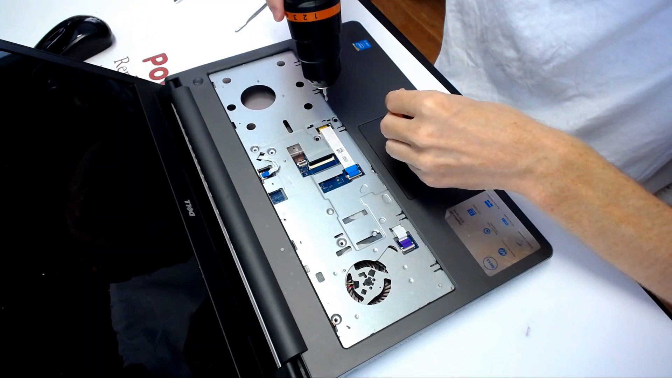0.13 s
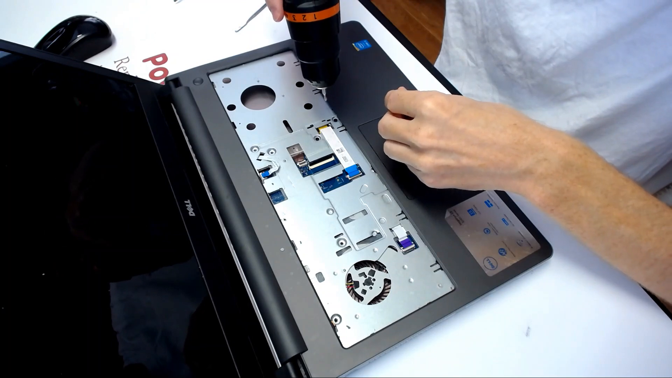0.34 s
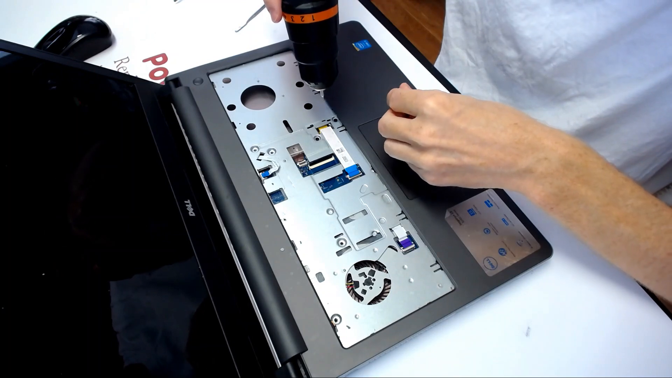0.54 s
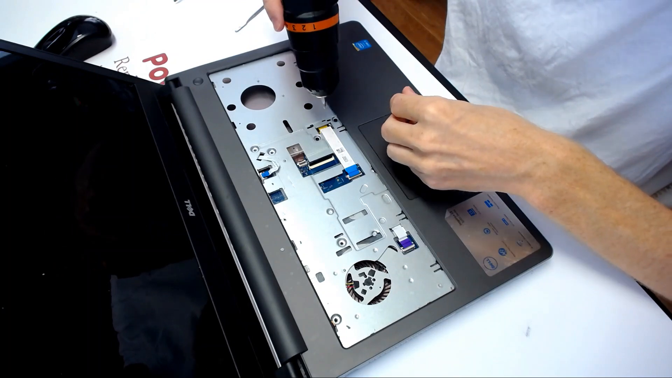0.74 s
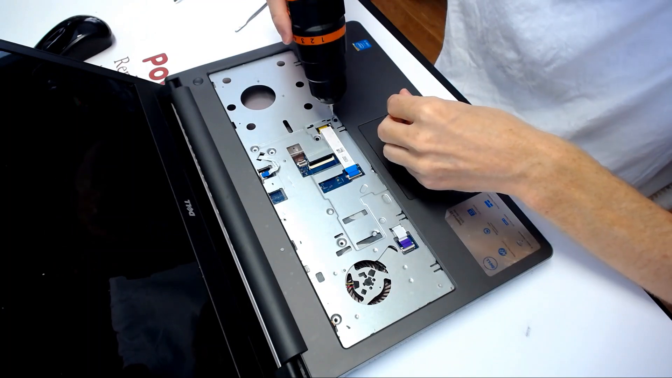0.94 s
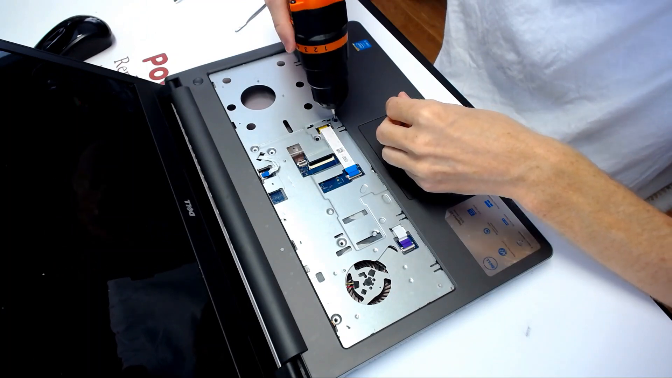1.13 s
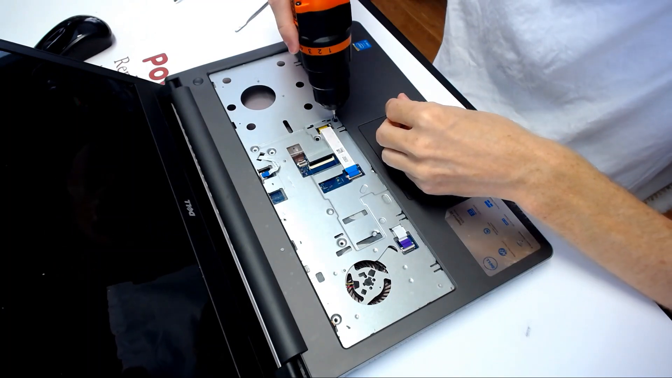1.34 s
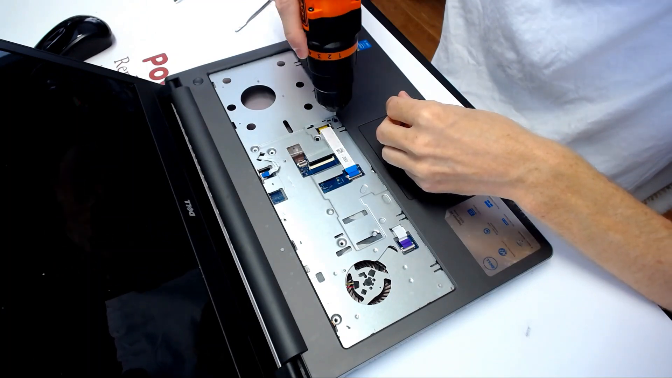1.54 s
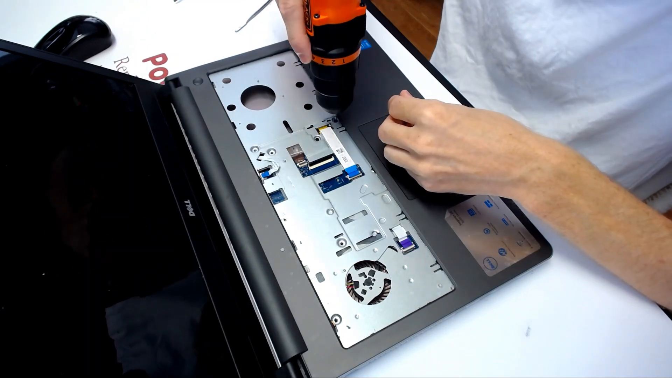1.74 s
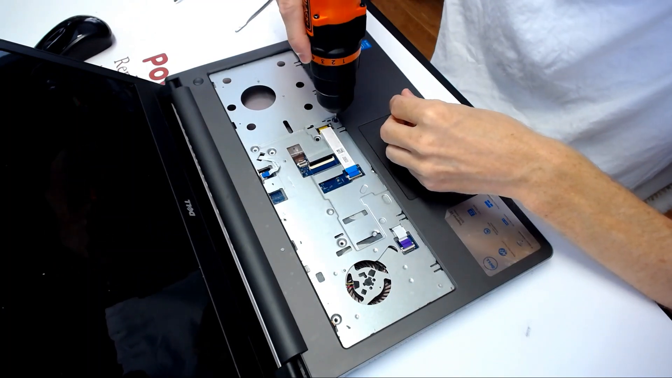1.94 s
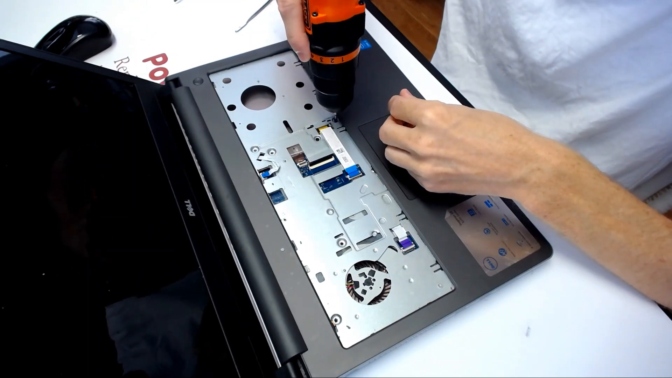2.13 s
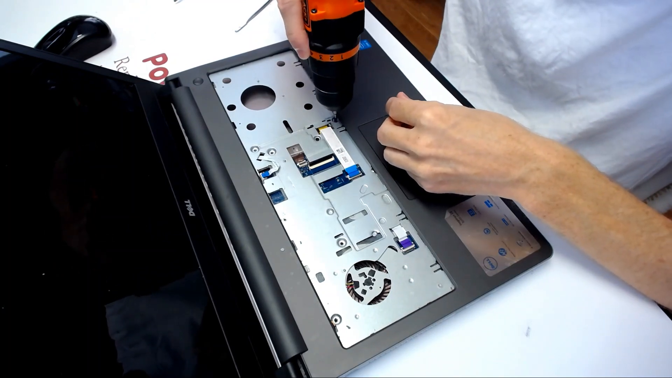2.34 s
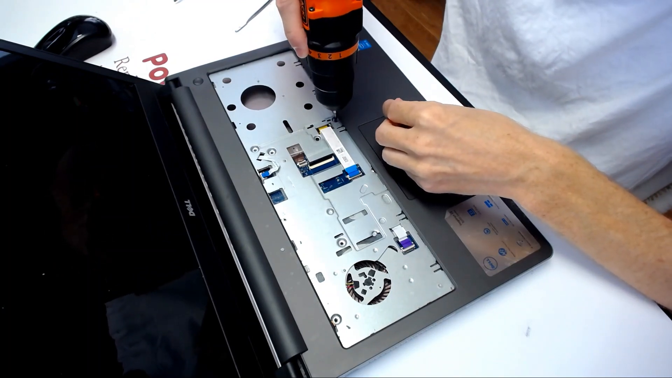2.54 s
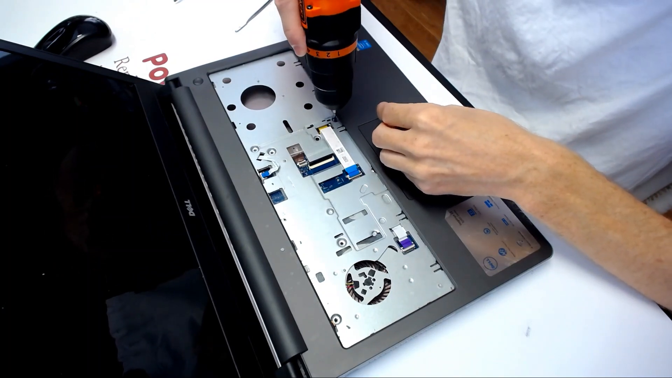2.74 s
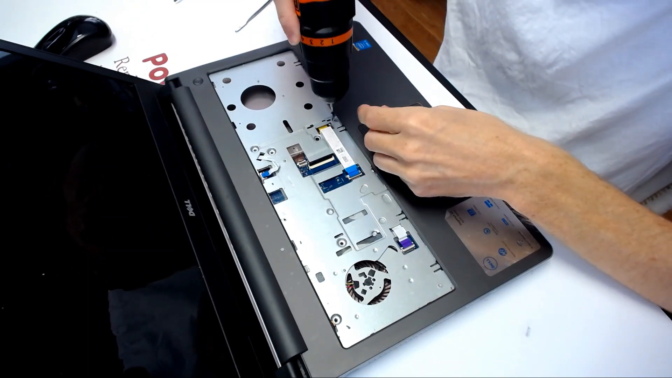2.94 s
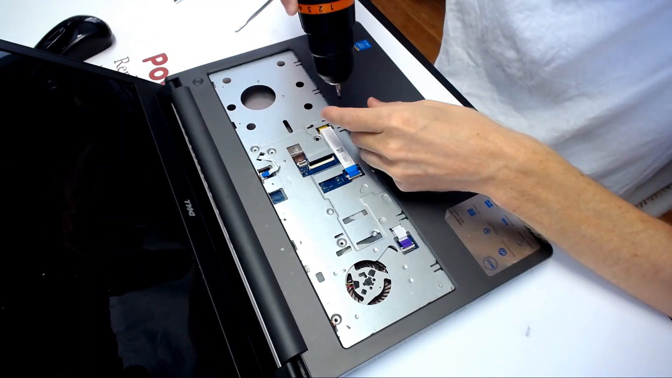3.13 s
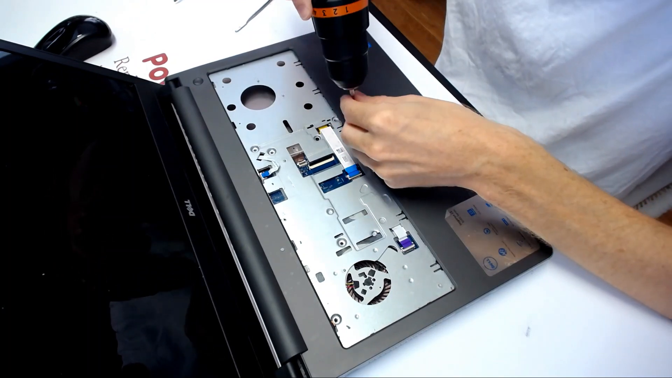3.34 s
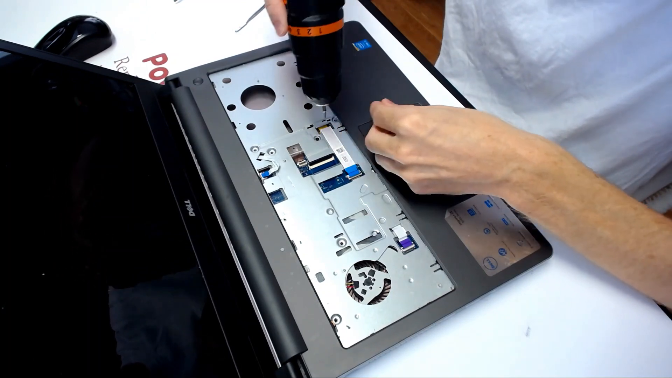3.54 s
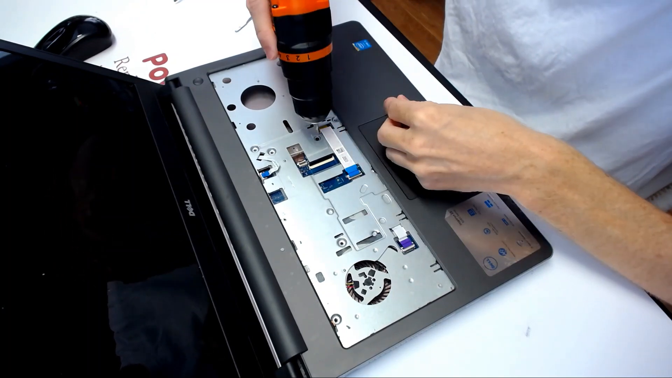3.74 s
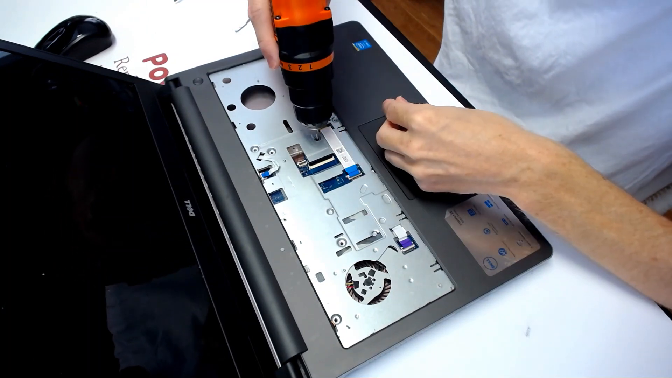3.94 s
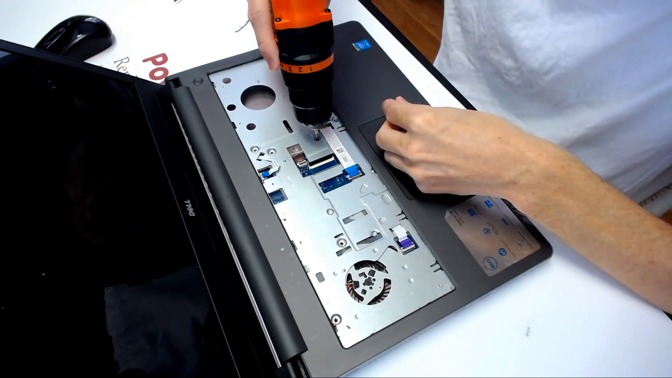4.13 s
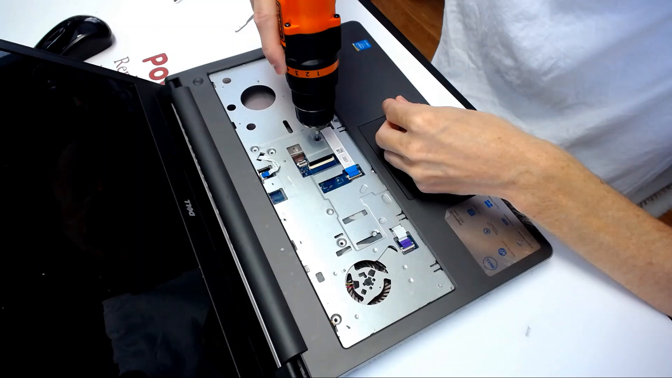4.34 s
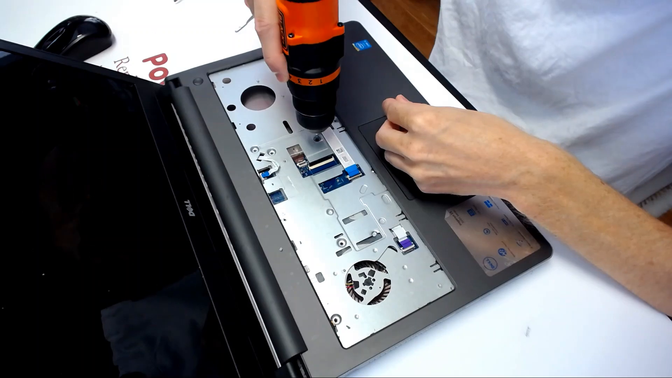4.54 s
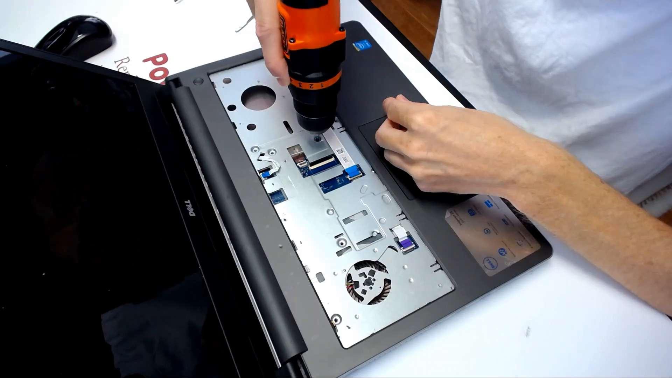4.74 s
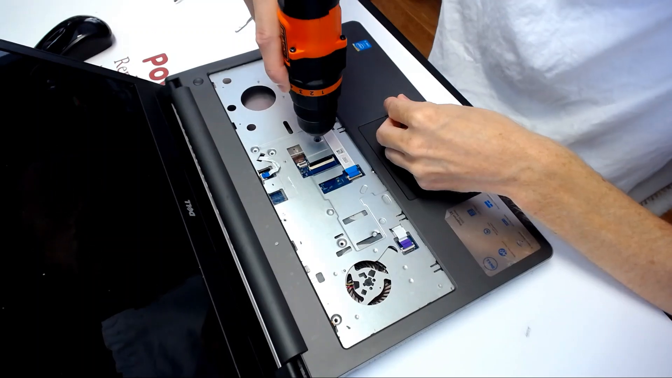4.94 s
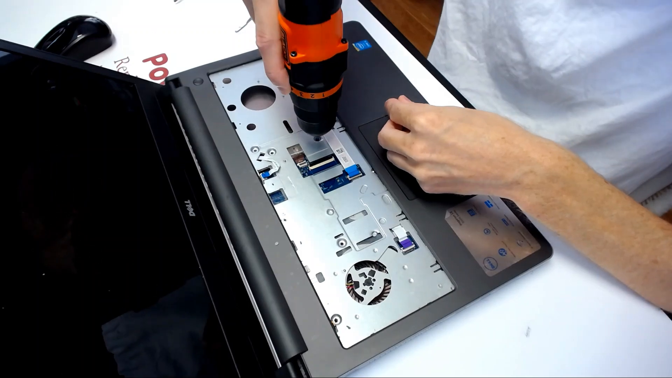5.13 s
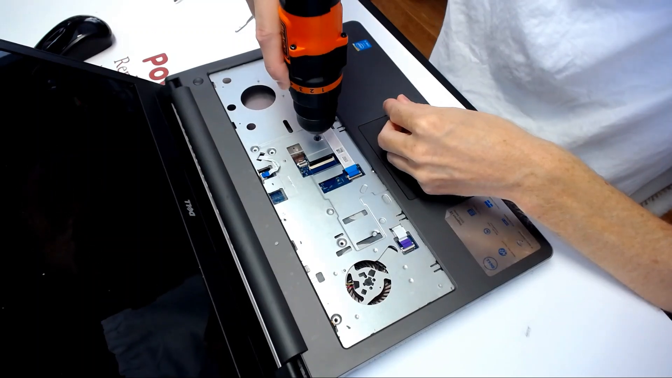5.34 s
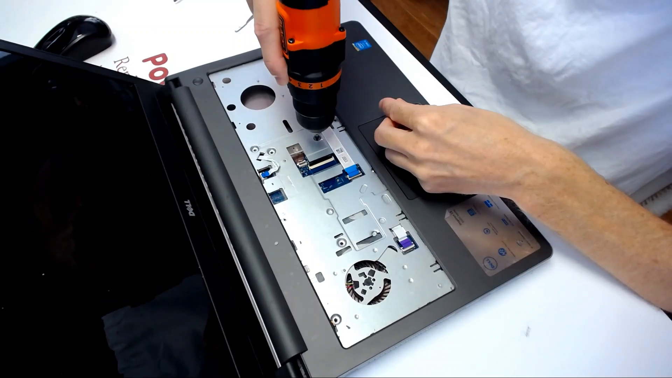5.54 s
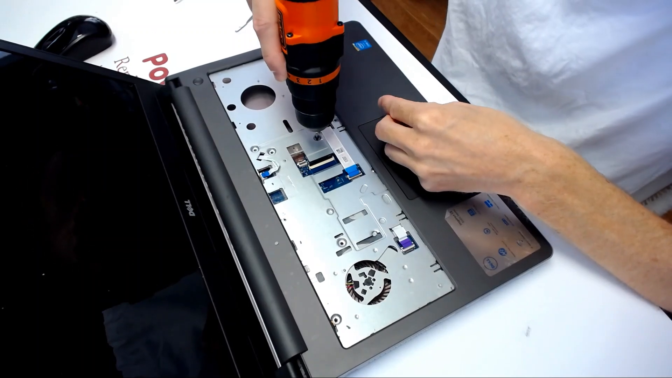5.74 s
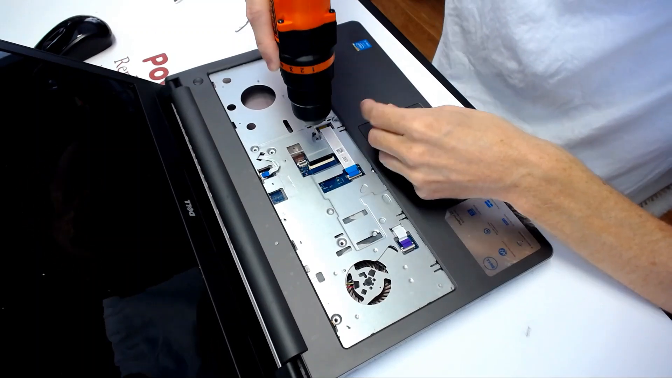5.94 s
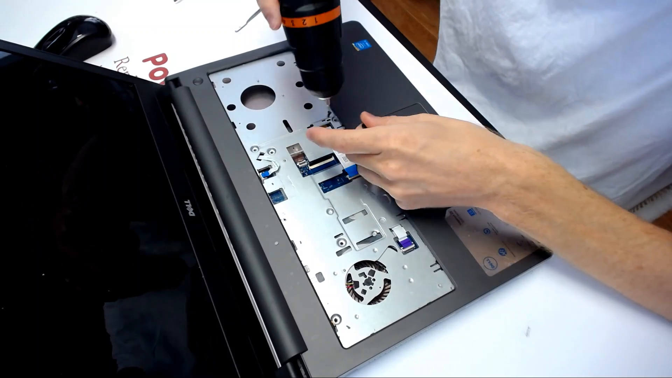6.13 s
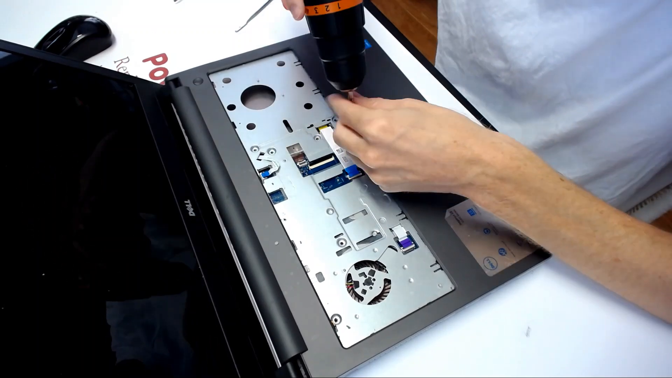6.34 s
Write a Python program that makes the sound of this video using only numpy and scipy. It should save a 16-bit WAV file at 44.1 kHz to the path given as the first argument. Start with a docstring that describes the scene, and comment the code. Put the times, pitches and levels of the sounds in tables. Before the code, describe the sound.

A cordless drill whines through two bursts on small laptop screws, the second slipping into a loud rapid ratcheting clatter before coasting down.

```python
"""Cordless drill on a laptop frame

A drill runs twice on small screws in the metal frame of a laptop lying on a desk, in a quiet room.
Its motor whines up as sines locked to the shaft, its gears rattle as dense tiny impacts that ring
the housing, and it coasts down when the trigger is let go. In the second run the bit slips in the
screw head and hammers the chassis: clicks, chatter and thuds. Two microphone ports give the stereo."""
import sys
import numpy as np
from scipy import signal
from scipy.fft import rfft, irfft, next_fast_len
from scipy.io import wavfile
from scipy.ndimage import map_coordinates

SR = 44100
rng = np.random.default_rng(int(sys.argv[2]) if len(sys.argv) > 2 else 0)


def output_pcm(signal):
    """Save a mono or channel-first signal as 16-bit PCM at the path in sys.argv[1].

    Samples are clipped to [-1, 1] before scaling.
    """
    pcm = np.clip(np.atleast_2d(signal).T, -1, 1) * 32767
    wavfile.write(sys.argv[1], SR, np.round(pcm).astype(np.int16))


N = 281799
TIME = np.arange(N) / SR
# column that splits a left-minus-right difference evenly over the two ports
SIDES = np.array([[.5], [-.5]])

# Pulls of the trigger. Each row: on in seconds, off in seconds, top speed in turns per second.
TRIGGER_PULLS = [(1.586, 3.0, 404.0), (4.368, 6.02, 406.0)]


def from_db(db):
    """Decibels to gain."""
    return 10 ** (np.asarray(db) / 20)


def rms_one(x):
    """Scale to unit power."""
    return x / np.sqrt(np.mean(x ** 2) + 1e-20)


def curve(points):
    """A table of times and values, joined by straight lines in time."""
    rows = np.array(points)
    return np.interp(TIME, rows[:, 0], rows[:, 1])


def at_hz(points, hz):
    """Read a spectrum on a log-frequency axis."""
    points = np.array(points)
    return np.interp(np.log(hz + 1), np.log(points[:, 0]), points[:, 1])


def drift(rate):
    """Smooth random wandering with spread 1, through 2 * rate random points a second."""
    knots = rng.standard_normal(4096)
    return rms_one(map_coordinates(knots, [TIME * rate * 2], order=3, mode="wrap"))


def lag(x, seconds):
    """Follow a control with a time constant."""
    keep = np.exp(-1 / (seconds * SR))
    return signal.lfilter([1 - keep], [1, -keep], x)


def bins():
    """Frequencies in Hz of the padded transform."""
    return np.fft.rfftfreq(2 * next_fast_len(N // 2 + SR // 4), 1 / SR)


def through(x, response):
    """Filter by a frequency response."""
    return irfft(rfft(x, 2 * (len(response) - 1)) * response)[..., :N]


def lift(modes, hz, modes_db=0):
    """Gain of a set of resonances standing above a flat response."""
    power = sum(from_db(db + modes_db) ** 2 / (1 + (2 * (hz - centre) / width) ** 2)
                for centre, width, db in modes)
    return np.sqrt(1 + power)


def body(spectrum, modes=(), modes_db=0):
    """Causal response of unit energy: a broad spectrum with resonances standing out of it."""
    hz = bins()
    size = rms_one(from_db(at_hz(spectrum, hz)) * lift(modes, hz, modes_db))
    # folding the cepstrum forward in time gives the minimum-phase response
    cepstrum = irfft(np.log(size))
    cepstrum[1:len(hz) - 1] *= 2
    cepstrum[len(hz):] = 0
    return np.exp(rfft(cepstrum))


def spread(pair):
    """Mix a common and a difference signal to left and right, alike in the bass and less so above."""
    # Each row: frequency in Hz, left-right likeness (held to at most 1 below).
    likeness = [(50, 1.25), (300, .98), (800, 0.92), (1600, 0.5), (3000, 0.68), (4000, 0.2), (5500, 0.1),
                (8000, 0.76), (9500, 0.8), (11000, 0.53)]
    alike = np.clip(at_hz(likeness, bins()), -1, 1)
    common = through(pair[0], np.sqrt((1 + alike) / 2))
    difference = through(pair[1], np.sqrt((1 - alike) / 2))
    return common + difference * [[1], [-1]]


def grains(per_s, size_db):
    """Two streams of random tiny impacts, more uneven in size as size_db grows, at unit power."""
    sizes = from_db(size_db * np.minimum(rng.exponential(1, (2, N)), 4))
    signed = sizes * rng.choice([-1, 1], (2, N))
    struck = rng.random((2, N)) < per_s / SR
    # crowded moments get smaller grains, so density alone does not change the level
    return rms_one(signed * struck / np.sqrt(per_s))


def bursts(rows, t60):
    """An envelope that jumps at each event and dies away by 60 dB in t60 seconds."""
    return sum(from_db(row[1] - 60 * np.abs(TIME - row[0]) / t60) * (TIME >= row[0]) for row in rows)


def held(rows, attack_s):
    """Envelope of (start, end, dB, t60) events that rise, hold and die away."""
    envelope = 0
    for start, end, db, t60 in rows:
        fall = from_db(db - 60 * np.maximum(TIME - end, 0) / t60)
        rise = 1 - np.exp(-np.maximum(TIME - start, 0) / attack_s)
        envelope = envelope + fall * rise
    return envelope


def blows(rows, click_db, chatter_db, chatter_t60, tail_db, tail_t60):
    """Each blow is a click, a short chatter of loose parts and a weak tail from the room."""
    chatter = from_db(chatter_db) * bursts(rows, chatter_t60)
    tail = from_db(tail_db) * bursts(rows, tail_t60)
    force = (chatter + tail) * rng.standard_normal((2, N))
    for s, db, *rest in rows:
        force[0, round(s * SR)] -= from_db(db + click_db)
    return spread(force)


def tone(cycles, gain, flutter_db, pan_db, port_phase):
    """A fluttering sine that meets the two microphone ports with its own level and phase (radians)."""
    level = gain * from_db(flutter_db * drift(22) + pan_db * SIDES)
    return np.sqrt(2) * level * np.sin(2 * np.pi * cycles + port_phase * SIDES)


def room_air():
    """Quiet room tone: steady noise shaped by a spectrum that falls from the bass up."""
    # Each row: frequency in Hz, relative level in dB.
    air_spectrum = [(12, -43.5), (20, -3), (61, -7), (92, -9.5), (155, -13), (178, -8), (319, -9),
                    (525, -15.5), (571, -19.5), (620, -16), (1420, -27.5), (1830, -32), (15000, -44.5)]
    noise = spread(rng.standard_normal((2, N)))
    return from_db(-64.5) * through(noise, body(air_spectrum))


def room_hum():
    """Faint steady tones in the room, each a sine with a slightly wandering phase."""
    # Each row: frequency in Hz, level in dB ahead of a common trim.
    hum_tones = [(59.2, -70), (156.1, -82), (624.5, -79.5), (710.6, -91), (1437, -85.5), (7192, -102)]
    trim_db = -1.5
    return sum(np.sqrt(2) * from_db(db + trim_db) * np.sin(2 * np.pi * hz * TIME + .5 * drift(6))
               for hz, db in hum_tones)


def hands_on_case():
    """Hands shift on the case: skin rubbing makes many tiny impacts, heard as a dull rustle."""
    # Each row: start in seconds, end in seconds, level in dB, t60 in seconds.
    rubs = [(1.15, 1.34, -65, .7), (3.93, 4.03, -53.5, .4), (4.12, 4.19, -50.5, .22)]
    # Each row: frequency in Hz, relative level in dB.
    rustle_spectrum = [(30, -7), (90, 6), (200, -4), (500, -10.5), (900, -16.5), (2000, -23.5),
                       (8000, -36.5)]
    rub = spread(grains(1500, size_db=2))
    return through(rub * held(rubs, attack_s=.025), body(rustle_spectrum))


def thuds(rows, delay_s, width_s, thud_db):
    """After a blow the drill drops back on the work and pushes the laptop against the desk."""
    push = sum(from_db(db + thud_db) * np.exp(-.5 * ((TIME - s - delay_s) / width_s) ** 2)
               for s, peak, db in rows)
    return -signal.sosfilt(signal.butter(1, 18, "high", fs=SR, output="sos"), push)


def ratchet():
    """Evenly spaced slips, growing harder on the whole: (s, relative peak dB, relative thud dB)."""
    start_s, end_s = 4.6207, 4.8802
    first_db, last_db, uneven_db, thud_db = -7.5, -0.3, 2, -20
    along = np.linspace(0, 1, 12)
    times = start_s + (end_s - start_s) * along
    peaks = first_db + (last_db - first_db) * along + uneven_db * rng.standard_normal(len(along))
    return [(s, db, thud_db) for s, db in zip(times, peaks)]


def bit_on_screw():
    """Grinding, slips and knocks of the bit all sound through the laptop chassis."""
    # Grinding in the screw head. Each row: start in seconds, end in seconds, relative dB, t60 in seconds.
    grinding = [(1.595, 1.664, -34.5, 0.11), (2.5, 2.535, -35.5, 0.26), (2.68, 2.74, -42, 0.28),
                (4.385, 4.47, -30, 0.21), (4.47, 4.51, -24.5, 0.75), (4.555, 4.888, -24.5, 0.23),
                (5.73, 5.76, -40, 0.58)]
    # Single jumps of the bit out of the screw's cross.
    # Each row: time in seconds, relative peak in dB, relative dB of the thud that follows.
    single_slips = [(4.454, -6, -26), (4.487, -8, -24), (4.519, -18, -32), (4.55, -5, -24),
                    (4.571, -2.5, -22), (4.603, -2, -34), (4.886, -8.5, -45)]
    # Bit knocking on the frame. Each row: time in seconds, relative peak in dB, relative thud in dB.
    frame_knocks = [(1.128, -27, -44), (1.134, -45, -48), (1.296, -63, -56), (1.622, -14, -31),
                    (1.63, -19, -28), (2.531, -19.5, -55), (2.687, -22.5, -46), (3.936, -22, -51),
                    (3.941, -27, -57), (3.983, -35, -60), (4.025, -32, -66), (4.108, -38, -59),
                    (4.153, -41.5, -48.5), (5.737, -19.5, -60)]
    # Resonances of the chassis. Each row: frequency in Hz, width in Hz, relative lift in dB.
    chassis_modes = [(273, 75, 6), (385, 22, -8), (876, 210, 0.5), (1290, 72, 0), (1490, 89, 1.5),
                     (1790, 170, 4.5), (2490, 69, 2), (2900, 67, -7)]
    # Spectra of the three contacts. Each row: frequency in Hz, relative level in dB.
    scrape_spectrum = [(30, -13), (150, -12), (280, -6), (520, -2.5), (850, -1.5), (1300, -7), (1900, -3.5),
                       (2800, -7.5), (5000, -16.5), (12000, -38.5)]
    slip_spectrum = [(60, -2.5), (280, -7), (520, -13.5), (850, 3), (1300, -1.5), (1900, 0.5), (2800, -2.5),
                     (5000, -7), (8000, -10), (14000, -50)]
    knock_spectrum = [(35, -28), (70, -4.5), (220, -6), (340, -3), (500, -5.5), (830, 3), (1450, -6),
                      (1900, -2.5), (2800, -15.5), (6300, -31), (8400, -37.5), (14000, -65)]

    jumps = single_slips + ratchet()
    # just before each slip the bit rides up the flank of the screw's cross and grinds less
    riding = sum(np.exp(-.5 * ((TIME - s + .003) / .004) ** 2) for s, peak, thud in jumps)
    grind = spread(grains(2500, size_db=1.5)) * held(grinding, attack_s=0.011)
    grind = grind * from_db(2.5 - 2.7 * riding)
    slips = blows(jumps, click_db=8.0, chatter_db=-8.5, chatter_t60=0.059, tail_db=-32.5, tail_t60=0.36)
    knocks = blows(frame_knocks, click_db=6.5, chatter_db=-5.0, chatter_t60=0.045,
                   tail_db=-25.5, tail_t60=0.46)

    ringing = through(grind, body(scrape_spectrum, chassis_modes, modes_db=3.5))
    ringing = ringing + through(slips, body(slip_spectrum, chassis_modes, modes_db=6.0))
    # a light knock barely sets the frame ringing
    ringing = ringing + through(knocks, body(knock_spectrum, chassis_modes, modes_db=-3))
    slip_thuds = thuds(jumps, delay_s=0.0141, width_s=0.0016, thud_db=6.0)
    knock_thuds = thuds(frame_knocks, delay_s=.008, width_s=0.00054, thud_db=11.5)
    return ringing + slip_thuds + knock_thuds


def motor_speed():
    """Turns per second: the motor spins up while the trigger is held and friction stops it afterwards."""
    # The second screw drags on the motor. Each row: time in seconds, turns per second lost.
    screw_drag = [(4.6, 0), (4.72, 11.6), (5.1, 12), (5.35, 4.3), (5.6, 0)]
    # time constants of the main rise and of the last few percent, and the share of the latter
    spin_up_s, settle_s, settle_share = .09, .28, .06
    # coasting: time constant of the viscous loss, and dry friction (turns per s lost each second)
    coast_s, friction = 1.65, 225
    speed = -curve(screw_drag)
    for on, off, top in TRIGGER_PULLS:
        powered = np.clip(TIME - on, 0, off - on)
        coasting = np.maximum(TIME - off, 0)
        main_gap = (1 - settle_share) * np.exp(-powered / spin_up_s)
        settle_gap = settle_share * np.exp(-powered / settle_s)
        driven = top * (1 - main_gap - settle_gap)
        dry_loss = friction * coast_s
        speed = speed + np.maximum((driven + dry_loss) * np.exp(-coasting / coast_s) - dry_loss, 0)
    return np.maximum(speed, 0)


def load_db():
    """dB that hand pressure adds to rattle, hiss and hum: added load builds slower than it lets go."""
    # The hand leans on the drill and loads the gears. Each row: start in seconds, end in seconds,
    # dB aimed for on the rattle, on the hiss, on the motor hum.
    presses = [(1.596, 1.664, 30, 31.4, 0), (1.715, 1.894, 9.5, 8.3, 1.5), (1.92, 2.022, 8.5, 4.4, -4.5),
               (2.02, 2.223, 9.5, 9.2, 7.5), (2.268, 2.575, 9, 6.6, 7), (2.614, 2.794, 9.5, 7.4, 8),
               (2.813, 2.927, 7, 3.4, 3.5), (4.371, 4.504, 14.5, 18.3, 19), (4.515, 4.925, 10, 6.3, 12),
               (4.95, 5.186, 13, 12.7, -3), (5.205, 5.386, 9, 7.3, -0.5), (5.384, 5.727, 9.5, 9.5, 9.5)]
    build_s, release_s = 0.042, 0.012
    aim = sum(np.outer(added, (TIME >= start) & (TIME < end)) for start, end, *added in presses)
    return lag(np.minimum(aim, lag(aim, build_s)), release_s)


def gear_gains(speed, rattle_load, hiss_load):
    """Rattle and hiss follow speed and load, and jump as the gears are jolted at each start."""
    # Unloaded gearbox. Each row: speed in turns per second, relative rattle in dB, relative brush hiss in dB.
    free_running = [(12, -65.5, -76.5), (62, -50, -58.5), (126, -41.5, -53.5), (150, -44.5, -57.5),
                    (227, -42.5, -53), (330, -37, -49.5), (394.5, -32, -43)]
    speeds, rattle_db, hiss_db = np.transpose(free_running)
    moving = np.minimum(speed / speeds[0], 1)
    jolt = bursts([(on, 0) for on, off, top in TRIGGER_PULLS], t60=0.41)
    rattle = moving * from_db(np.interp(speed, speeds, rattle_db) + rattle_load) + from_db(-31) * jolt
    hiss = moving * from_db(np.interp(speed, speeds, hiss_db) + hiss_load) + from_db(-42) * jolt
    return rattle, hiss


def tone_gain(law, speed, load):
    """A tone grows with speed and follows its share of the load."""
    full_speed = 404  # turns per s
    db, db_per_doubling, share = law
    return from_db(db + db_per_doubling * np.log2((speed + 1) / full_speed) + share * load)


def armature_gain(law, speed, load):
    """The armature tones fade a further 2 dB while the motor coasts without current."""
    coasting = 1.0 - sum((TIME >= on) & (TIME < off) for on, off, top in TRIGGER_PULLS)
    unpowered = np.minimum(coasting, lag(coasting, 0.089))
    return tone_gain(law, speed, load) * from_db(-2 * unpowered)


def flares(order):
    """Gain of a motor tone flaring up: a chirp under strain, a buzz on the screw, a moan in coasting."""
    # Each row: start in seconds, end in seconds, multiple of the shaft rate, level in dB.
    flare_ups = [(1.646, 1.668, 3, -25), (1.654, 1.666, 9, -25), (3.563, 3.745, 3, -53),
                 (3.715, 3.802, 6, -44), (4.766, 4.864, 1, -39), (4.983, 5.043, 1, -29.5),
                 (5.076, 5.098, 1, -29), (5.135, 5.168, 1, -32.5)]
    rows = [(start, end, db, .06) for start, end, k, db in flare_ups if round(k) == order]
    return held(rows, attack_s=0.0025)


def gear_whine(speed, turns, rattle_gain, gear_load):
    """The pinion whistles; weaker meshing tones follow the load and flare up as they cross a resonance."""
    # Each entry: dB running free at full speed, dB per doubling of speed, share of the load.
    pinion_law = (-50.5, 49, 1.35)
    # Faint tones carried by the gears. Each row: multiple of the shaft rate, dB relative to the rattle gain.
    mesh_tones = [(4, -34.5), (9, -23.5), (11, -27), (12, -25), (15, -26.5)]
    # Resonances that the tones glide through. Each row: frequency in Hz, width in Hz, lift in dB.
    mesh_modes = [(730, 160, 21.5), (1350, 69, 12.5), (1830, 110, 17), (2320, 80, 12.5), (4030, 260, 10.5)]
    echo_s, echo_db = .0031, -10.5  # reflection from the desk top

    tooth_cycles = 15 * turns
    out = tone(tooth_cycles, tone_gain(pinion_law, speed, gear_load),
               flutter_db=1.0, pan_db=10.0, port_phase=-1.2)
    load = rattle_gain * np.minimum(speed / 100, 1) ** 2
    for k, db in mesh_tones:
        hz = round(k) * speed
        # the echo from the desk alternately adds and cancels as a tone glides
        comb = np.abs(1 + from_db(echo_db) * np.exp(-2j * np.pi * hz * echo_s))
        gain = load * from_db(db) * lift(mesh_modes, hz) * comb
        out = out + tone(round(k) * turns, gain, flutter_db=4.0, pan_db=-1.0, port_phase=.3)
    return out


def motor_whine(speed, turns, gear_load, hum_load):
    """Rotor unbalance sounds once a turn; the three-pole armature sounds at multiples of three."""
    # Each entry of the three: dB running free at full speed, dB per doubling of speed, share of the load.
    shaft_law = (-46, 32, 1)
    pole_law = (-46, 21.5, 1.0)
    commutator_law = (-42, 20, 0.81)
    shaft_gain = tone_gain(shaft_law, speed, hum_load) + flares(order=1)
    pole_gain = armature_gain(pole_law, speed, hum_load) + flares(order=3)
    commutator_gain = armature_gain(commutator_law, speed, gear_load) + flares(order=6)
    hum = tone(turns, shaft_gain, flutter_db=1.95, pan_db=2.5, port_phase=-0.38)
    poles = tone(3 * turns, pole_gain, flutter_db=2.16, pan_db=-5.0, port_phase=-.2)
    commutator = tone(6 * turns, commutator_gain, flutter_db=0.7, pan_db=2.5, port_phase=0.39)
    chirp = tone(9 * turns, flares(order=9), flutter_db=7, pan_db=7, port_phase=0)
    return hum + poles + commutator + chirp


def gearbox(speed, turns, rattle_gain, hiss_gain, beat, planet_beat, uneven_db):
    """Tooth impacts ring the housing, and brushes hiss; both swell with each shaft and planet turn."""
    # Clicks inside the drill: light ones before the first run (perhaps its switch),
    # and gear slack taken up at each motor start. Each row: time in seconds, relative peak in dB.
    inner_clicks = [(1.1303, -32.5), (1.2974, -55), (1.5864, -23.5), (4.368, -17)]
    # Resonances of the drill housing. Each row: frequency in Hz, width in Hz, relative lift in dB.
    housing_modes = [(1810, 64, -11.5), (2700, 120, -26), (3194, 90, -8), (3470, 96, -0.5), (4150, 130, -7),
                     (4360, 115, -3), (5080, 90, -3.5), (6800, 480, -6)]
    # Spectra of rattle and brush hiss. Each row: frequency in Hz, relative level in dB.
    rattle_spectrum = [(60, -46.5), (150, -35), (300, -16.5), (600, -14.5), (1000, -14), (1450, -10),
                       (1950, 0), (2500, -1.5), (3300, 2), (3800, 0), (4350, 1.5), (5400, -5.5), (6400, -3),
                       (7300, -16), (10000, -49)]
    hiss_spectrum = [(5000, -14), (7200, -3), (8400, 4), (9000, -0.5), (9600, 1), (10600, -7),
                     (12000, -13.5), (15500, -51)]

    planet_turns = turns * 5 / 12
    shaft_pulse = 1 + beat * np.cos(2 * np.pi * turns)
    planet_pulse = 1 + planet_beat * np.cos(2 * np.pi * planet_turns)
    pulsing = rms_one(shaft_pulse * planet_pulse) * from_db(uneven_db * drift(70))
    housing = body(rattle_spectrum, housing_modes, modes_db=8.0)
    teeth = spread(grains(800 + 14 * speed, size_db=0.0)) * pulsing * rattle_gain * from_db(0.54)
    clicks = blows(inner_clicks, click_db=-19.5, chatter_db=-5.5, chatter_t60=0.0083,
                   tail_db=-33, tail_t60=.15)
    brushes = spread(grains(1500 + 18 * speed, size_db=3.5)) * pulsing * hiss_gain * from_db(2.0)
    return through(teeth + clicks, housing) + through(brushes, body(hiss_spectrum))


def at_ports(sound):
    """Rattle and blows reach the two ports with a level balance and a left phase lead set by frequency."""
    # Each row: frequency in Hz, left minus right in dB.
    balance = [(60, 1.5), (380, 1.5), (800, 1.5), (1290, -3.5), (1950, 2.5), (2800, -0.5), (3600, 1.2),
               (4050, -4), (5000, 2), (5500, -1.5), (7200, 0), (8000, -6), (10200, 1)]
    # The left port leads in the band of the housing resonances. Each row: frequency in Hz, lead in radians.
    port_lead = [(600, 0), (1500, 0.53), (3200, 0.29), (4000, 1.68), (4550, 0.64), (5500, 1.2), (6400, 0)]
    hz = bins()
    lean = from_db(at_hz(balance, hz) / 2)
    left, right = sound
    right_response = np.exp(-1j * at_hz(port_lead, hz)) / lean
    return np.array([through(left, lean), through(right, right_response)])


def scene():
    """Shaft speed and hand pressure drive the whine and the gears, over the bit, the hands and the room."""
    # The drill drifts slightly to the right late in the second run.
    # Each row: time in seconds, left minus right in dB.
    drill_place = [(1.6, -0.4), (4.6, -0.4), (5.1, -0.5), (5.7, -1.5)]
    speed = motor_speed()
    gear_load, hiss_load, hum_load = load_db()
    rattle_gain, hiss_gain = gear_gains(speed, gear_load, hiss_load)
    # the speed wavers slightly; its running sum is the shaft angle in turns
    turns = np.cumsum(speed * (1 + 0.00054 * drift(18))) / SR
    tones = motor_whine(speed, turns, gear_load, hum_load) + gear_whine(speed, turns, rattle_gain, gear_load)
    gears = gearbox(speed, turns, rattle_gain, hiss_gain, beat=0.13, planet_beat=0.095, uneven_db=1.16)
    drill = tones + at_ports(gears + bit_on_screw())
    placed = drill * from_db(curve(drill_place) * SIDES)
    return placed + room_air() + room_hum() + hands_on_case()


def record(dry):
    """The loudest peaks are rounded off towards full scale and the top of the treble is cut."""
    cutoff_hz = 15827  # 70 dB down from here up
    rounded = dry / (1 + dry ** 6) ** (1 / 6)
    return signal.sosfilt(signal.cheby2(16, 70, cutoff_hz, fs=SR, output="sos"), rounded)


dry = scene()
out = record(dry)
output_pcm(out)
```